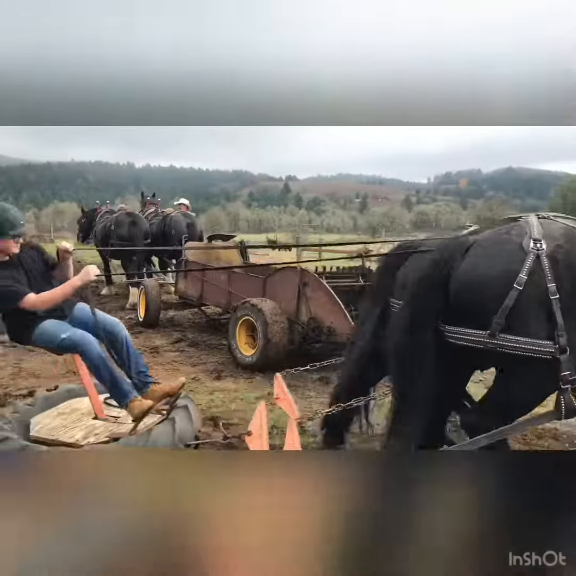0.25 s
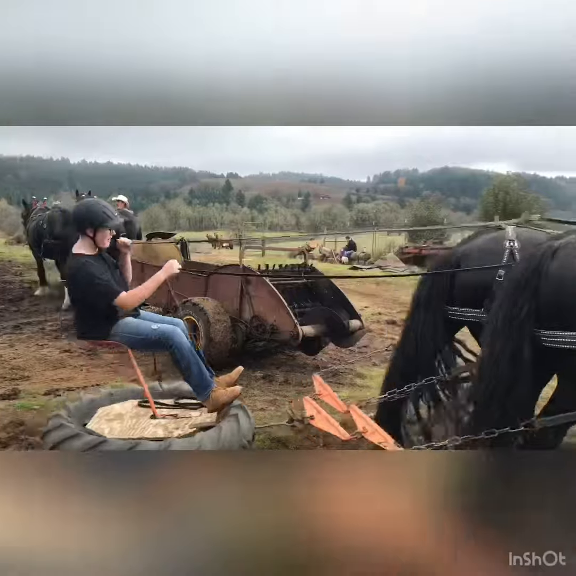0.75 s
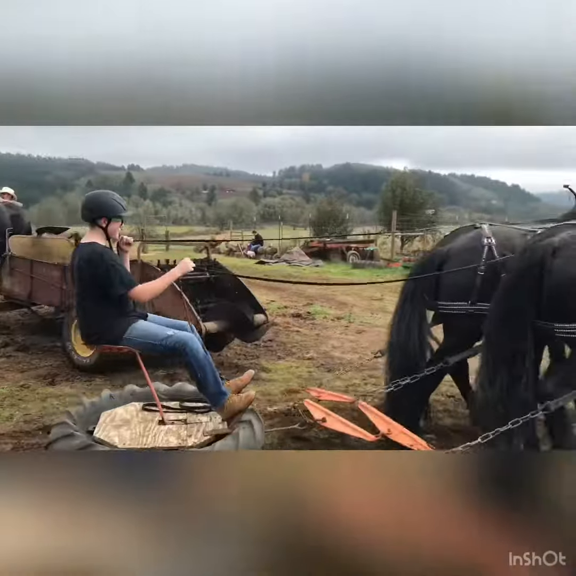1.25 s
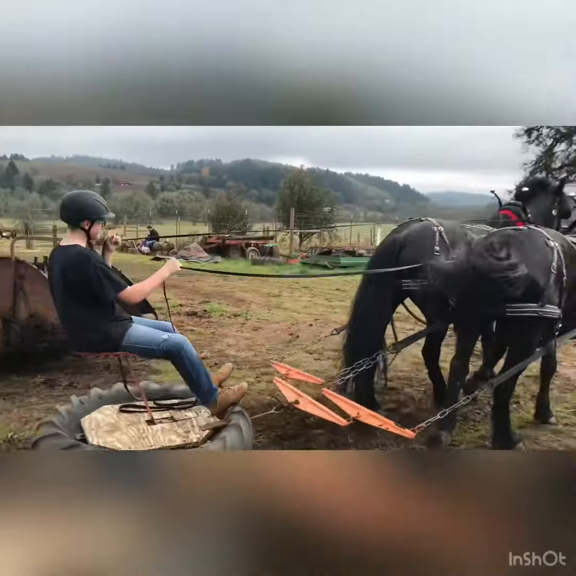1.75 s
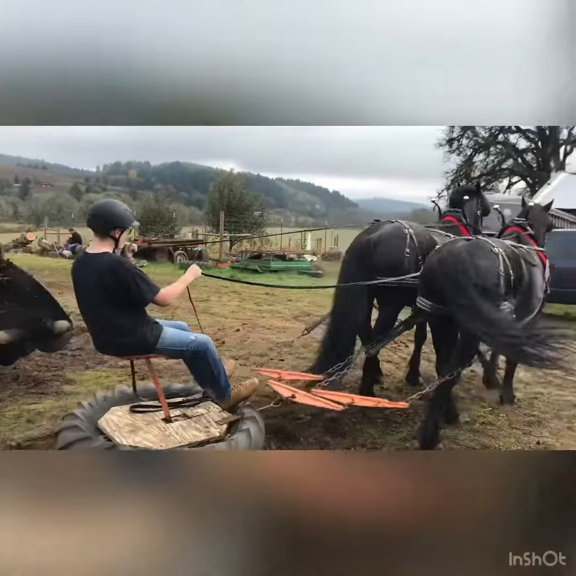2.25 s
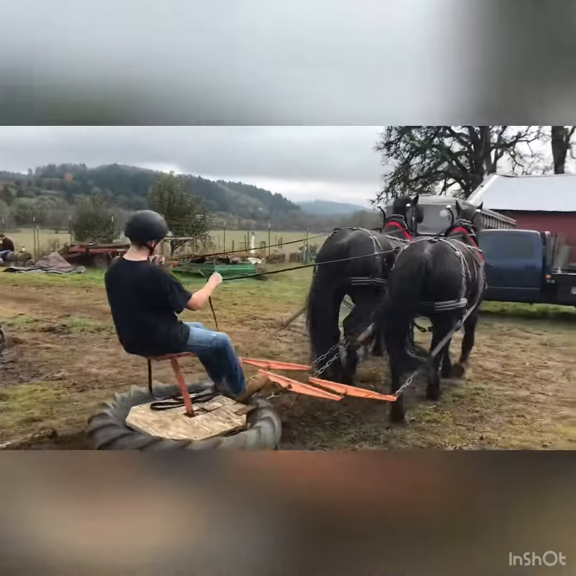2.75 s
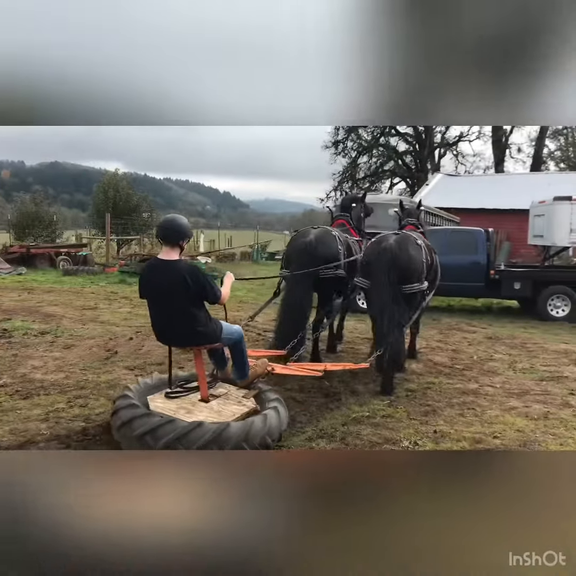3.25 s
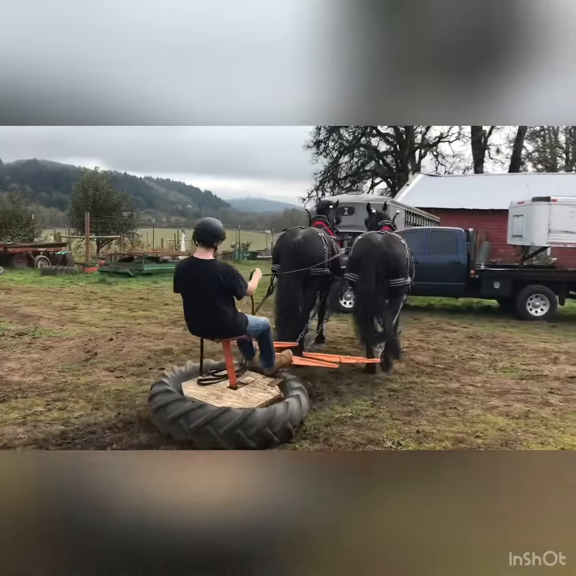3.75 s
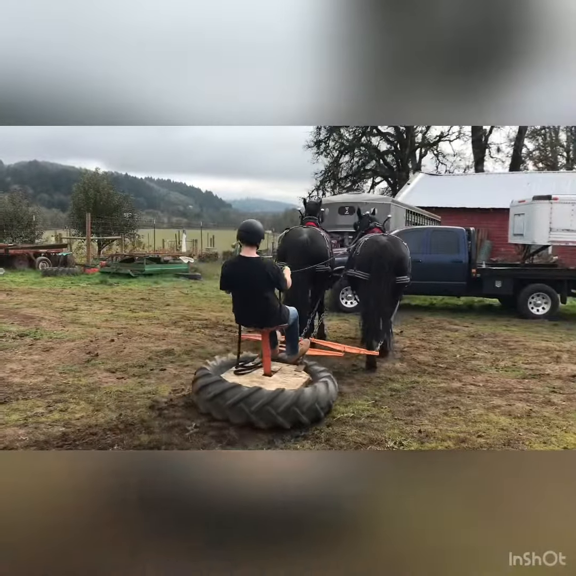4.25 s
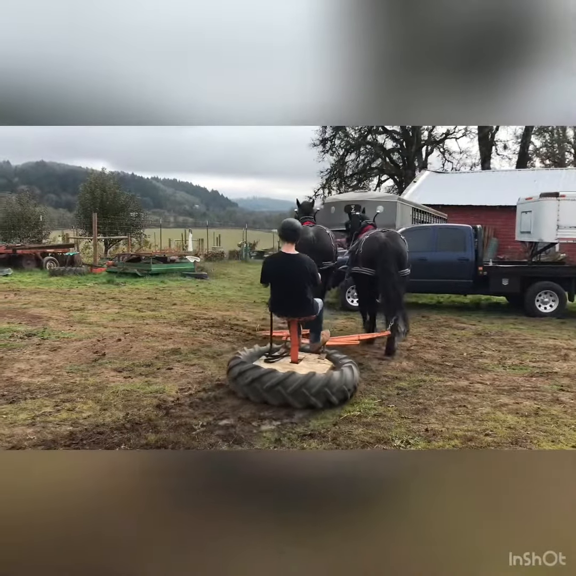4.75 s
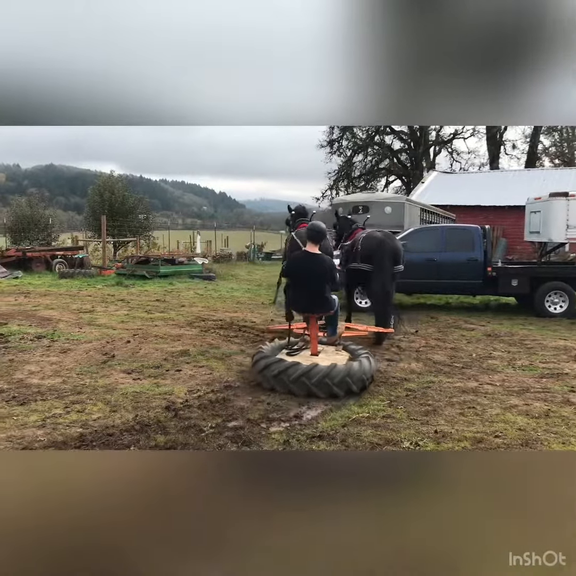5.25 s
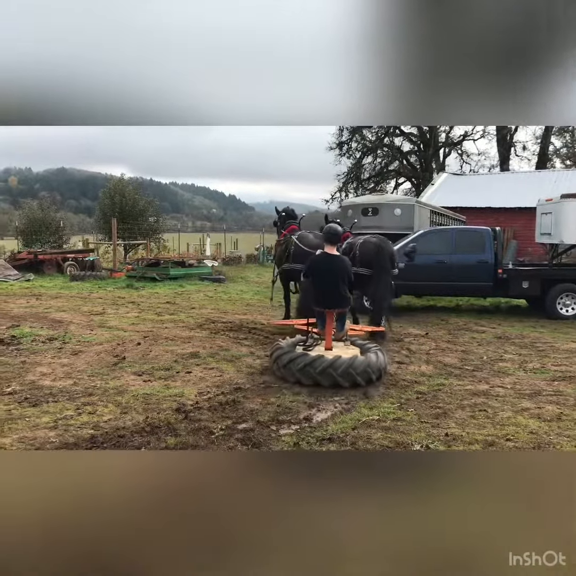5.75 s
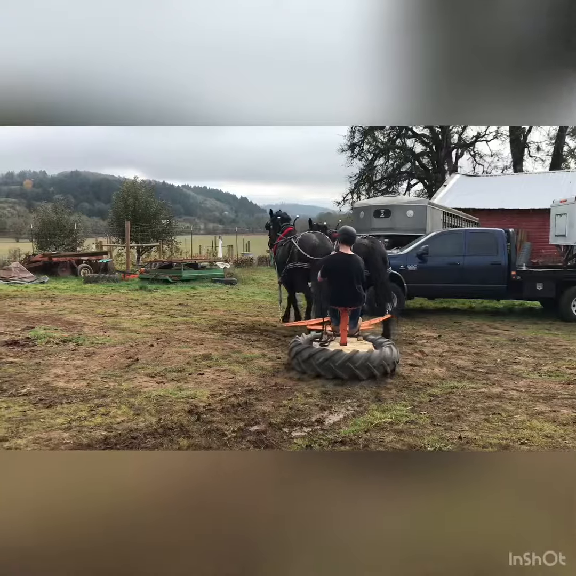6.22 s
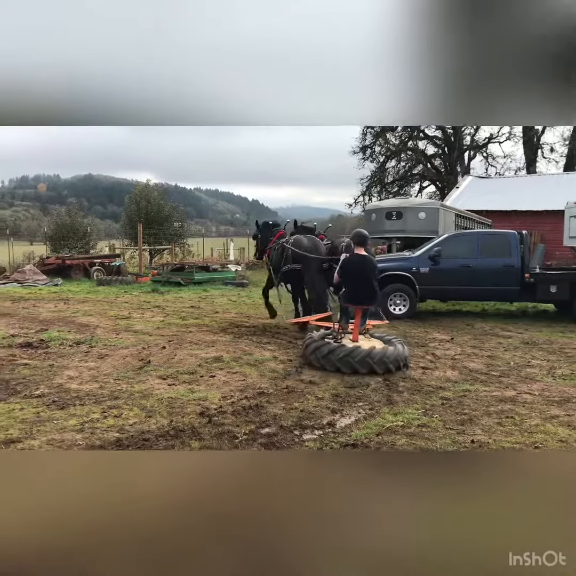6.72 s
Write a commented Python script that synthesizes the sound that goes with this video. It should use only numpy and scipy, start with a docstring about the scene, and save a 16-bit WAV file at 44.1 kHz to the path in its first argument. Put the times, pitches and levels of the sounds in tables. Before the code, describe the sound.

A heavy tyre slides over soft earth behind two walking draft horses. Deep, soft hoof thuds and a low uneven rumble sit under grass rustle, small stalk snaps and buckle ticks. Steel hitch bars and chains snap together irregularly, loudest about a third of the way in and again near the end. Dry open-air phone pickup; the scrape and rustle fade with distance.

```python
"""Steel evener bars and trace chains clank as they snap together between two draft horses and a tyre sled.
The team drags the sled away over a soft farmyard. Steel is decaying modes plus noise in the same modes;
hooves are sagging low sines with a noise slap; the tyre's rumble, scrape, rustle and swish are shaped noise.
Knocks, clods, scuffs, snapping stalks and a ticking buckle are short noise bursts."""
import sys
import numpy as np
from scipy import signal
from scipy.fft import rfft, irfft, next_fast_len
from scipy.io import wavfile
from scipy.ndimage import map_coordinates

SR = 44100
rng = np.random.default_rng(int(sys.argv[2]) if len(sys.argv) > 2 else 0)


def volts(x):
    """Linear amplitude factor 10**(x/20) for a level x in dB, scalar or array-like."""
    e = np.asarray(x, float) / 20
    return 10 ** e


def bounce(signal):
    """Save signal as a 16-bit WAV file at the path given by the first command-line argument."""
    frames = np.transpose(np.atleast_2d(signal))
    limited = np.clip(frames, -1, 1)
    pcm = np.round(limited * 32767).astype(np.int16)
    wavfile.write(sys.argv[1], SR, pcm)


N = 307818
RUSTLE_START_DB, RUSTLE_LOSS_DB = -51.5, 7  # level at the start; loss per doubling of distance


def unit(x):
    """Scales x to rms 1."""
    return x / np.sqrt(np.mean(x ** 2) + 1e-20)


def filtered(x, response):
    """Multiplies the spectrum of x by a response of frequency."""
    m = next_fast_len(len(x) + 8192)
    f_hz = np.fft.rfftfreq(m, 1 / SR) + 1  # +1 keeps logarithms finite
    return irfft(rfft(x, m) * response(f_hz), m)[:len(x)]


def coloured(x, spectrum):
    """Shapes x through (f/Hz, relative level/dB) points, at rms 1."""
    hz, db = np.transpose(spectrum)
    return unit(filtered(x, lambda f: volts(np.interp(np.log(f), np.log(hz), db))))


def wobble(knots_per_s):
    """Draws a smooth random curve through normal knots."""
    knots = rng.standard_normal(int(N / SR * 60))
    return map_coordinates(knots, [np.arange(N) * knots_per_s / SR])


def add(track, start_s, sound):
    """Adds a sound to the track from start_s, cut at the track's end."""
    part = track[round(start_s * SR):][:len(sound)]
    part += sound[:len(part)]


def fade(t, t60_s, attack_s):
    """Quick rise, then exponential fall."""
    return volts(-60 * t / t60_s) * (1 - np.exp(-t / attack_s))


def doublings():
    """Doublings of the team's distance since the start, per sample, at a steady walk."""
    start_m, walk_m_per_s = 4.42, 1.49
    return np.log2(1 + walk_m_per_s * np.arange(N) / SR / start_m)


def bursts(rows):
    """Noise in a Gaussian band, fading; rows (t/s, level before fade/dB, f/Hz, width/octaves, t60/s)."""
    out, t = np.zeros(N), np.arange(SR // 8) / SR
    for start_s, db, hz, octaves, t60_s in rows:
        white = rng.standard_normal(len(t))
        band = filtered(white, lambda f: np.exp(-.5 * (np.log2(f / hz) / octaves) ** 2))
        add(out, start_s, volts(db) * unit(band) * fade(t, t60_s, 0.00038))
    return out


def drag():
    """The tyre slides: ground rumble, lumpy mud scrape, grass rustle with crackling stalks, bright swish."""
    # ground rumble level: t/s, level/dB before wobble
    rumble_level = [(0.0, -37), (0.29, -38.5), (0.39, -46.5), (0.8, -39), (1.32, -46.5), (1.73, -43),
                    (2.47, -44), (2.8, -39.5), (3.19, -41.5), (3.58, -42), (3.73, -48.5), (5.03, -47.5),
                    (5.13, -51), (6.01, -46.5), (6.34, -52.5), (6.98, -45)]
    # bright swish level: t/s, level/dB
    swish_level = [(0.0, -66), (0.64, -56.5), (1.01, -61.5), (2.14, -56), (2.29, -66.5), (2.86, -60.5),
                   (3.03, -66.5), (3.34, -63), (3.52, -71), (4.04, -69), (4.28, -85), (4.49, -78.5),
                   (4.7, -69.5), (5.6, -87), (6.2, -73.5), (6.98, -93)]
    # ground rumble spectrum: f/Hz, relative level/dB
    rumble_spectrum = [(15, -54.5), (25, -42), (45, -12.5), (69, 2), (87, -2), (113, -12.5), (154, -15),
                       (184, -29), (250, -19), (320, -53), (550, -120)]
    # mud scrape spectrum: f/Hz, relative level/dB
    scrape_spectrum = [(76, -25.5), (130, 1), (220, -9), (362, -8), (509, -14), (995, -14), (1140, -16.5),
                       (1230, -16.5), (3000, -30.5), (3900, -51), (6600, -120)]
    # grass rustle spectrum: f/Hz, relative level/dB
    rustle_spectrum = [(880, -30.5), (1500, -3), (2690, 1), (2880, 1), (3620, 1.5), (4500, 0.5), (4970, -5),
                       (6240, -1), (7840, -8), (8660, -7), (9650, -10), (10500, -21), (12500, -9),
                       (14500, -15.5), (16000, -11)]
    scrape_start_db, scrape_loss_db = -48, 4.5  # loss per doubling of distance

    t = np.arange(N) / SR
    rumble_db = np.interp(t, *np.transpose(rumble_level))
    swish_db = np.interp(t, *np.transpose(swish_level))
    # grass and ground swallow the treble most
    scrape_db = scrape_start_db - scrape_loss_db * doublings()
    rustle_db = RUSTLE_START_DB - RUSTLE_LOSS_DB * doublings()

    noise = rng.standard_normal((4, N))
    jolt = wobble(35)  # shared by scrape and rustle
    rumble = coloured(noise[0], rumble_spectrum) * volts(rumble_db + 0.67 * wobble(14))

    lumps = volts(.8 * jolt + 1.6 * wobble(35))
    scrape = coloured(noise[1] * lumps, scrape_spectrum) * volts(scrape_db)

    # random clicks, 150 a second on average
    stalks = (rng.random(N) < 150 / SR) * volts(4 * noise[1]) * np.sign(noise[0])
    grass = noise[2] * volts(0.44 * jolt + .6 * wobble(23))
    rustle = coloured(grass + 6.7 * stalks, rustle_spectrum) * volts(rustle_db)

    # the brightest part comes and goes in gusts of its own
    gusts = noise[3] * volts(2.6 * wobble(25))
    swish = coloured(gusts, [(4000, -65.5), (8000, -1.5), (12000, -6.5), (16000, -10)])
    return rumble + scrape + rustle + swish * volts(swish_db)


def steel():
    """Each clank rings the modes of the parts it strikes; rattling contact is noise in those modes, choked wide."""
    # clanks: t/s, evener level/dB, singletree level/dB, clevis level/dB, chain level/dB, favoured f/Hz
    clanks = [(0.0338, -62, -45, -59, -54, 1500), (0.6296, -57, -28, -41, -35.5, 3780),
              (.717, -72, -41, -55, -51, 3450), (.7344, -62, -47, -75, -51, 2020),
              (0.7828, -57, -49, -64, -54, 1420), (.8185, -75, -48.5, -79, -63, 1450),
              (0.8843, -66, -48, -45, -58, 1500), (.916, -68, -52, -64, -57, 1480),
              (1.6113, -68, -39, -43, -42, 1782), (2.2083, -24, -28, -15.5, -18, 1790),
              (2.2432, -33, -42, -34, -23.5, 1770), (3.423, -41.5, -42, -26, -35, 1100),
              (3.446, -43, -41, -40.5, -31.5, 1120), (4.0827, -59, -37, -42, -42, 2360),
              (4.0123, -63, -58.5, -61, -53, 1770), (4.56, -46, -38.5, -30, -42, 960),
              (4.5655, -48, -36.5, -49, -36.5, 6300), (5.9348, -55, -47, -61.5, -33, 1273),
              (5.9708, -25.5, -25, -53, -18.5, 3410), (5.9848, -37.5, -28, -41, -23.5, 3670),
              (6.5161, -78, -61.5, -66, -52.5, 1350), (6.5969, -83, -61, -58, -51.5, 1365)]
    # evener bar modes: f/Hz, relative level/dB, free t60/s
    evener = [(554, -3, .2), (1116, 0, .34), (1830, -3, .4)]
    # singletree bar modes: f/Hz, relative level/dB, free t60/s
    singletree = [(900, -7, .24), (1360, 0, .14), (1420, -7, .12), (1782, 0, .15)]
    # clevis modes: f/Hz, relative level/dB, free t60/s
    clevis = [(2153, 0, .3), (3031, -6, .2), (3420, -6, .07), (4052, -11, .25)]
    # trace chain modes: f/Hz, relative level/dB, free t60/s
    chain = [(1570, -10, .14), (1690, -8, .14), (2560, -11, .2), (2630, 0, .13), (2825, -11, .17),
             (3050, -5, .16), (3260, -11, .32), (3704, -14, .22), (3820, -14, .15), (4266, -7, .22),
             (4480, -14, .21), (4600, -17, .25), (4764, -22, .26), (5006, -16, .2), (5350, -10, .14),
             (5420, -17, .24), (6028, -17, .26), (6300, -12, .07), (6690, -22, .17), (6885, -19, .2),
             (7150, -22, .14), (7413, -12, .14), (8600, -24, .1), (10900, -28, .12), (11750, -30, .14)]
    # one link singing alone: t/s, level before fade/dB, f/Hz, t60/s
    lone_link = (3.558, -49, 5350, .14)

    out, t = np.zeros(N), np.arange(SR // 2) / SR
    hz, mode_db, t60_s = np.transpose(evener + singletree + clevis + chain)[..., None]
    sizes = [len(evener), len(singletree), len(clevis), len(chain)]
    blows = sorted(clanks)
    until_next_s = np.diff([row[0] for row in blows] + [np.inf])
    for (start_s, *part_db, favoured_hz), gap_s in zip(blows, until_next_s):
        chance_db, phase = rng.standard_normal((2, len(hz), 1))
        # where a blow lands decides which modes it favours
        octaves = np.log2(hz / favoured_hz)
        place_db = 9 * np.exp(-(octaves / .2) ** 2) - 3 * abs(octaves)
        blow_db = np.repeat(part_db, sizes)[:, None]
        gain = volts(mode_db + blow_db + place_db + chance_db)

        ringing = fade(t, t60_s, .0005) * np.sin(2 * np.pi * hz * t + phase)
        tone = np.sum(gain * ringing, 0)
        tone *= np.exp(-np.clip(t - gap_s, 0, None) / 0.0052)  # the next contact stills the ringing

        def choked(f):
            """Sums the powers of the widened modes over a faint floor."""
            detune = (f - hz) / (.09 * hz + 60)
            return np.sqrt(np.sum(gain ** 2 * (volts(-76) + (1 + detune ** 2) ** -2), 0))

        noise = np.linalg.norm(gain) * unit(filtered(rng.standard_normal(len(t)), choked))
        contact = .28 * fade(t, .04, .0005)
        # loose links shaking on, and the yard's answer
        rattle = .15 * fade(t, .14, .003) + .03 * fade(t, .42, .02)
        add(out, start_s, tone + noise * (contact + rattle))

    start_s, db, link_hz, link_t60_s = lone_link
    add(out, start_s, volts(db) * fade(t, link_t60_s, 0.0033) * np.sin(2 * np.pi * link_hz * t))
    return out


def ticks():
    """Knocks, clods, scuffs, stalks and a buckle: noise bursts, each kind with its own width and decay."""
    # hard knocks under the louder clanks: t/s, level before fade/dB, f/Hz, width/octaves, t60/s
    knocks = [(.034, -29, 1450, 0.46, 0.027), (.63, -12.5, 1490, 0.19, .032),
              (.6296, -27, 4430, 0.66, 0.032), (.72, -36, 3000, .87, 0.028),
              (.737, -36.5, 1810, 0.3, 0.061), (.789, -35.5, 1430, 0.82, 0.088),
              (.887, -38, 1810, 0.51, 0.046), (2.2083, -4.5, 2480, 0.72, 0.012),
              (2.209, -25, 875, .7, 0.26), (2.2432, -16, 2200, 0.75, 0.052),
              (3.422, -24.5, 3300, 0.18, 0.026), (3.423, -28.5, 1930, 0.21, 0.085),
              (4.0827, -31.5, 2730, .15, 0.036), (4.083, -40, 5860, .05, 0.044),
              (4.561, -36.5, 905, 1, 0.11), (4.5668, -27.5, 5560, 0.54, 0.064),
              (5.97, -25.5, 1390, 0.63, 0.2), (5.9711, -29.5, 7400, 0.42, 0.084),
              (5.9855, -26, 2500, 1, .015)]
    # clods and hoof rims knocking dully: t/s, level before fade/dB, f/Hz
    clods = [(.5834, -37.5, 1050), (.6095, -34, 895), (.7741, -37, 1430), (.9494, -46, 904),
             (1.0395, -46, 1280), (1.9106, -44, 1130), (3.3463, -43.5, 1020), (3.3682, -43, 1040),
             (4.4682, -46.5, 1980), (5.1008, -53, 1210), (5.5747, -50.5, 1460), (6.3295, -46.5, 870),
             (6.8369, -35.5, 1000)]
    # hooves scuffing through grass: t/s, level before fade/dB, f/Hz
    scuffs = [(1.1744, -46.5, 4000), (2.4473, -48, 1510), (2.475, -47, 1700), (2.7003, -47.5, 3880),
              (2.7194, -48.5, 3320), (2.83, -48, 2990), (6.4762, -57.5, 2480)]
    # dry stalks snapping: t/s, level before fade/dB, f/Hz
    snaps = [(.0844, -41, 5970), (.1401, -38.5, 5000), (.15, -40, 9000), (.1845, -46, 5000),
             (.3894, -41, 8000), (.4444, -36, 4960), (.5616, -34, 10000), (1.0854, -44, 4500),
             (2.0288, -41, 4000), (2.3014, -38.5, 8000), (2.5666, -43.5, 5000), (2.8644, -40, 7000),
             (3.0131, -39, 7450), (4.2552, -49, 7000), (6.61, -53, 13000), (6.805, -56, 11900)]
    # buckle ticking on the harness: t/s, level before fade/dB, f/Hz
    buckle = [(1.0755, -53, 4180), (1.4212, -42, 3730), (2.5774, -44, 3600), (3.0565, -47, 4460),
              (3.683, -48, 4370), (3.7479, -46, 4200), (4.6444, -48, 3970), (6.3999, -54, 4440),
              (6.785, -56, 3500)]
    small_snaps_per_s, loudest_db, middle_hz = 6.7, -43.5, 7000  # loudest at the start

    # small snaps fall by chance and weaken with distance like the rustle
    wait, size, pitch = rng.random((60, 3)).T
    when_s = np.cumsum(-np.log(1 - wait)) / small_snaps_per_s
    far_db = RUSTLE_LOSS_DB * np.interp(when_s * SR, np.arange(N), doublings())
    small_db = loudest_db - far_db - 6 * size
    small_hz = middle_hz * 2 ** (1.5 * pitch - .75)
    small = np.transpose([when_s, small_db, small_hz])[when_s < N / SR]

    # rows, width/octaves, t60/s
    kinds = [(clods, 0.59, 0.039), (scuffs, 1.2, 0.13), (buckle, 0.28, 0.033),
             (snaps, 0.78, 0.014), (small, 0.78, 0.014)]
    rows = list(knocks)
    for events, octaves, t60_s in kinds:
        rows += [(*event, octaves, t60_s) for event in events]
    return bursts(rows)


def hooves():
    """A heavy hoof slaps dully and swings the soft ground for a few cycles, pitch sagging."""
    # hoof falls: t/s, thud level/dB, nominal thud f/Hz, slap level re thud before fade/dB
    falls = [(.039, -38, 54.5, 1), (.219, -21, 82, -19), (.371, -22.5, 74, -13), (0.575, -30.5, 71, -5),
             (0.735, -32, 60, -5), (.786, -27.5, 78, -6), (.882, -43.5, 54.7, 5.5),
             (.924, -26.5, 77.5, -13.5), (0.984, -31, 94, -34), (1.17, -34, 89, -9), (1.489, -34.5, 67, -9),
             (1.61, -33, 72, -2.5), (1.841, -36, 87.6, -34), (2.444, -35.5, 118.6, -2),
             (2.729, -31, 77, -6), (2.829, -46, 58.6, 8.5), (2.93, -14.5, 83.7, -24.5),
             (3.214, -36, 80, -24), (3.344, -34.5, 66, -3), (3.449, -36, 73.4, -22.5),
             (3.696, -29, 76, -17), (4.012, -40, 90, -4), (4.718, -33, 76.4, -37.5),
             (5.148, -40, 92, -14.5), (5.739, -34.5, 85.4, -28), (5.959, -44, 60.6, -4),
             (6.326, -42, 67.4, -15), (6.473, -42, 110, -8.5), (6.755, -40.5, 118, -7.5)]
    swell_s = 0.018  # time to the peak of the thud's envelope
    slap_spectrum = [(90, -38.0), (200, 9.5), (400, -4.0), (1200, -13), (4000, -49)]

    out, t = np.zeros(N), np.arange(SR // 3) / SR
    swell = (t / swell_s * np.exp(1 - t / swell_s)) ** 2
    for start_s, db, hz, slap_db in falls:
        # pitch sags from 1.34 to 0.8 of nominal
        phase = 2 * np.pi * hz * (.8 * t + 0.64 * 0.016 * (1 - np.exp(-t / 0.019)))
        thud = swell * np.sin(phase)
        slap = coloured(rng.standard_normal(len(t)), slap_spectrum) * fade(t, 0.063, 0.00077)
        add(out, start_s, volts(db) * (thud + volts(slap_db) * slap))
    return out


def scene():
    """Sums all sources at one microphone."""
    return (drag() + steel() + ticks() + hooves())[None]


def top_cut(x):
    """Nothing passes above the cut-off."""
    return signal.sosfilt(signal.butter(12, 16500, fs=SR, output="sos"), x)


def record(dry):
    """Phone microphone with a sharp upper band limit."""
    top_hz = 15830
    mix = filtered(dry[0], lambda f: f < top_hz)[None]
    return top_cut(mix)


dry = scene()
out = record(dry)
bounce(out)
```